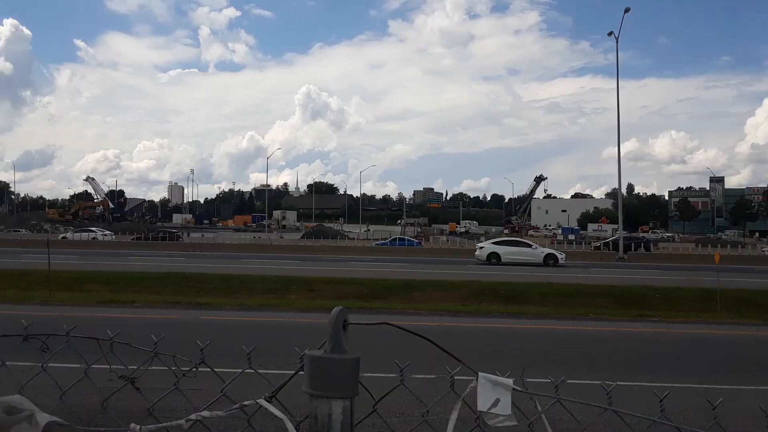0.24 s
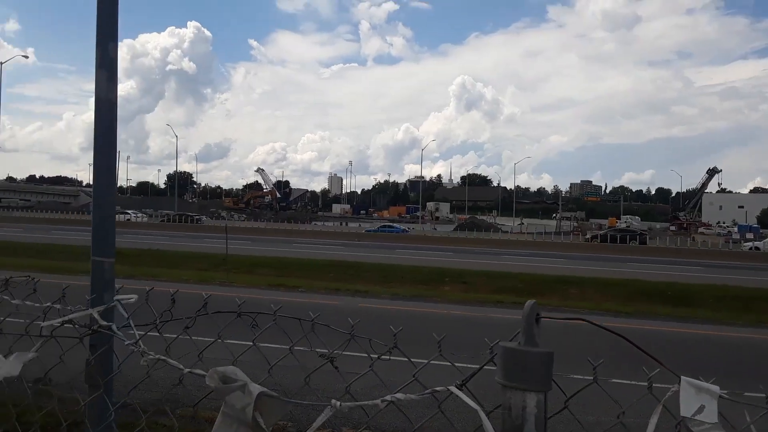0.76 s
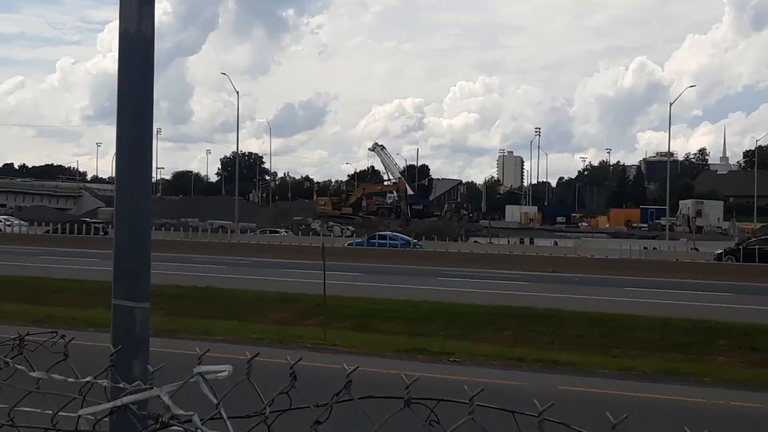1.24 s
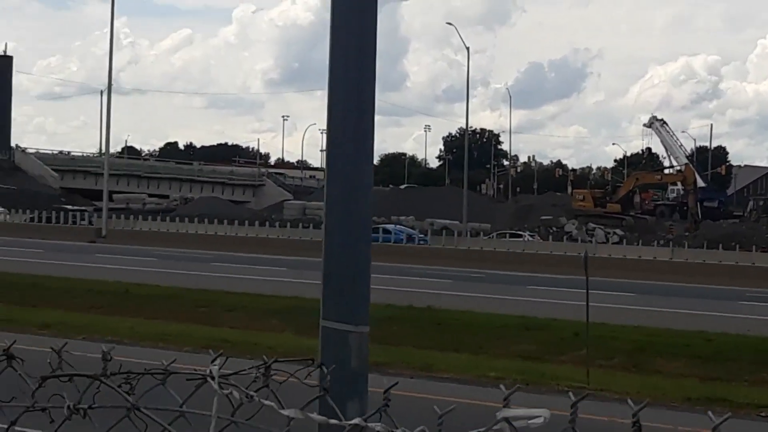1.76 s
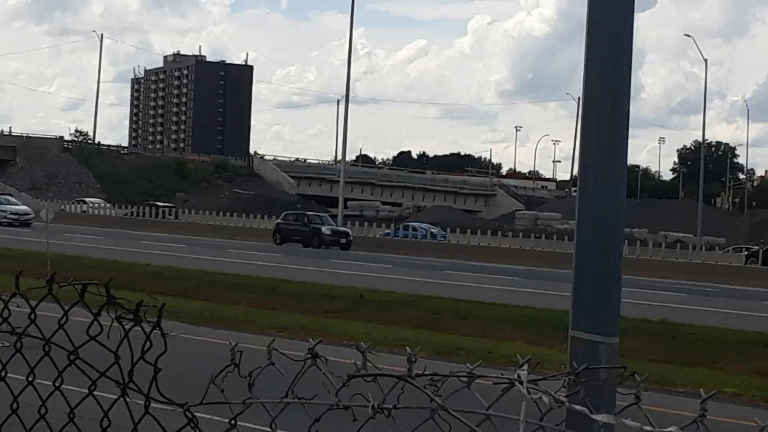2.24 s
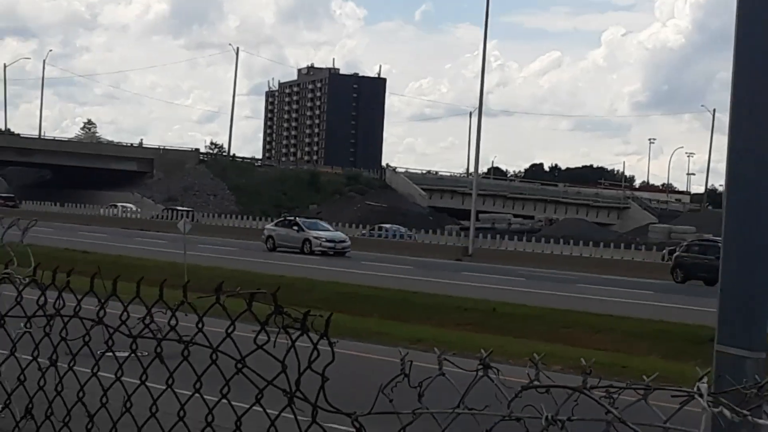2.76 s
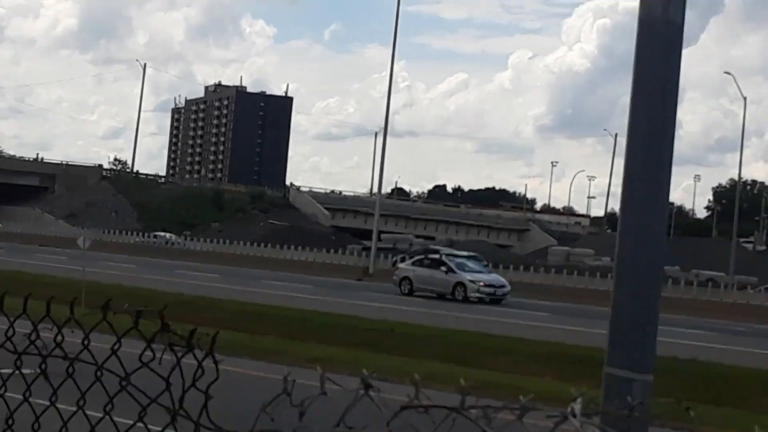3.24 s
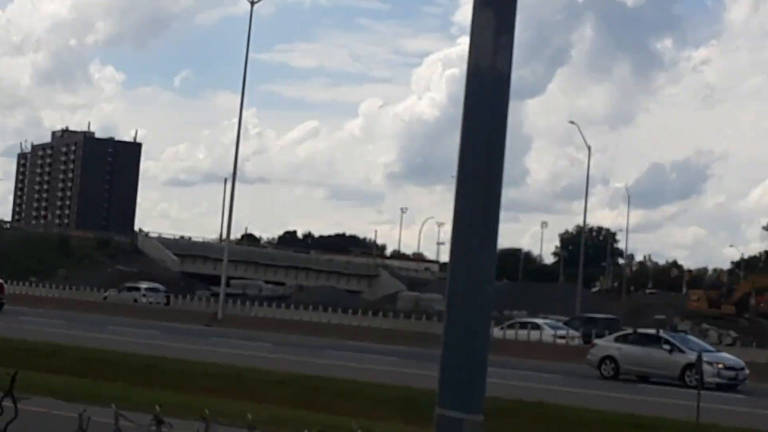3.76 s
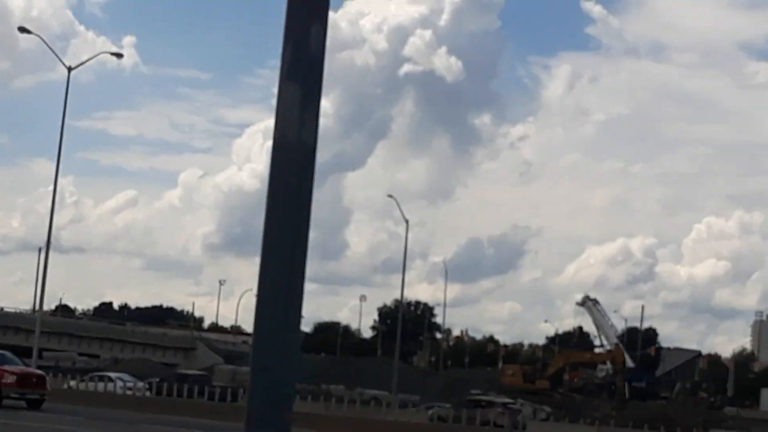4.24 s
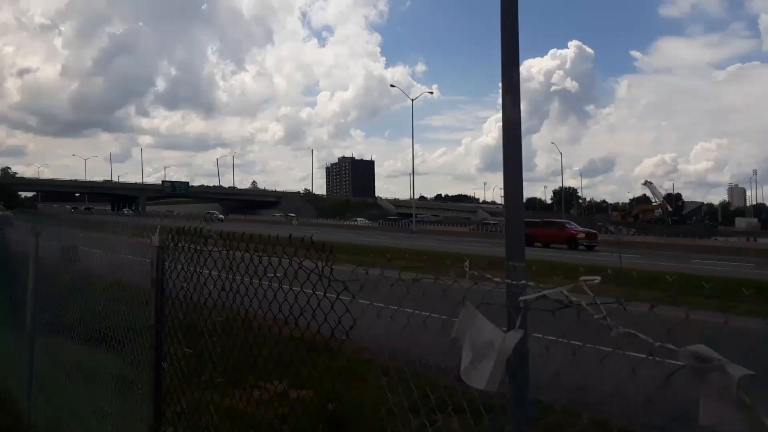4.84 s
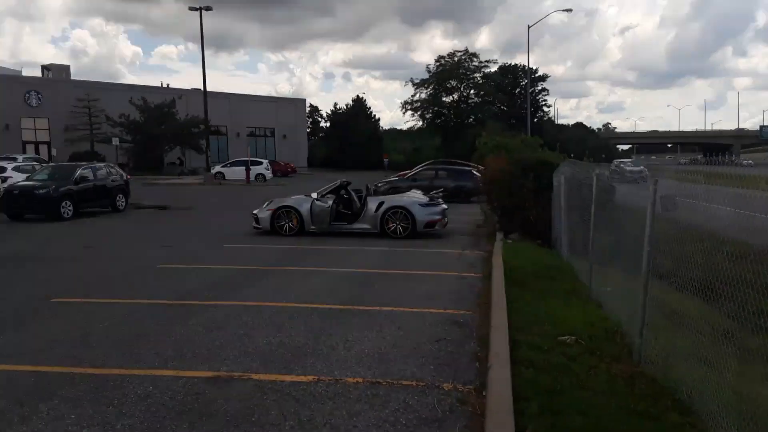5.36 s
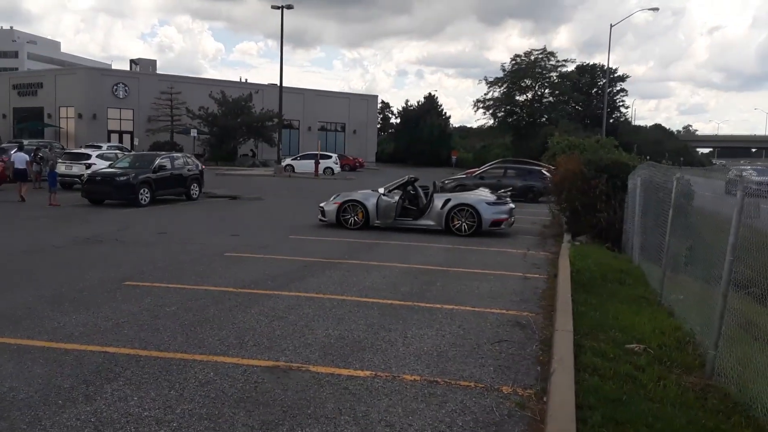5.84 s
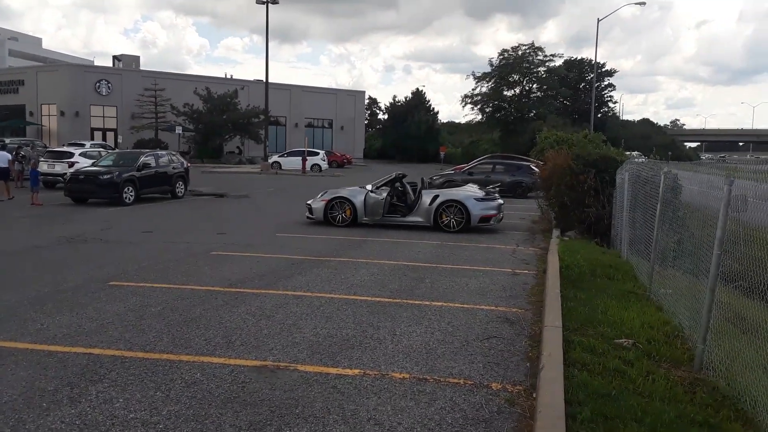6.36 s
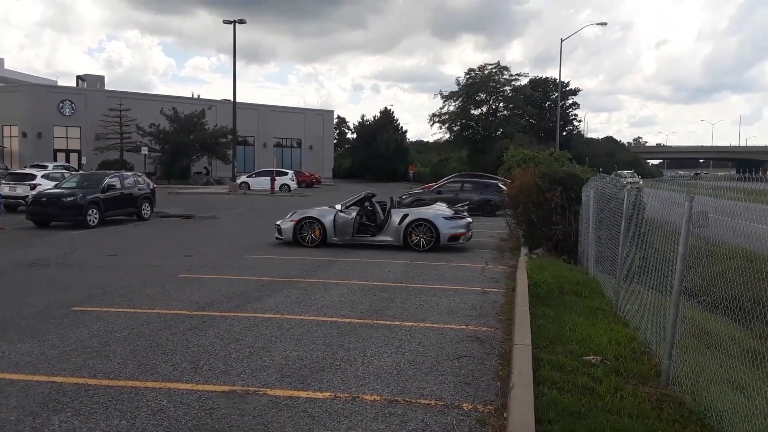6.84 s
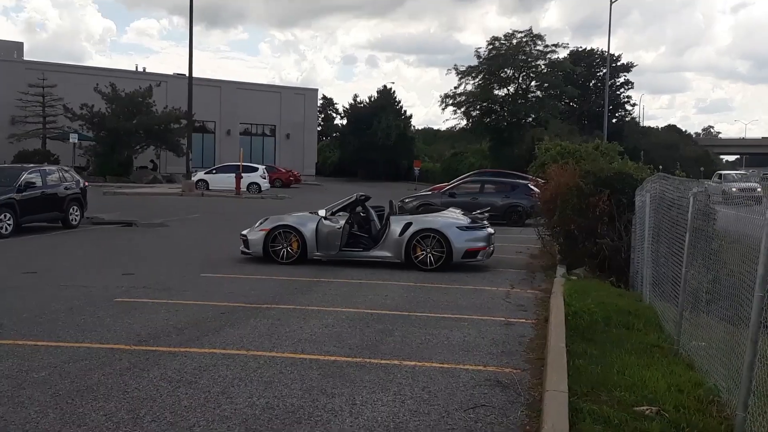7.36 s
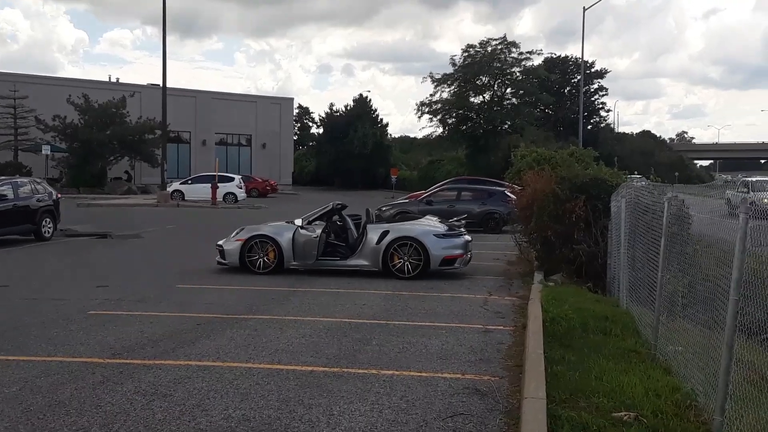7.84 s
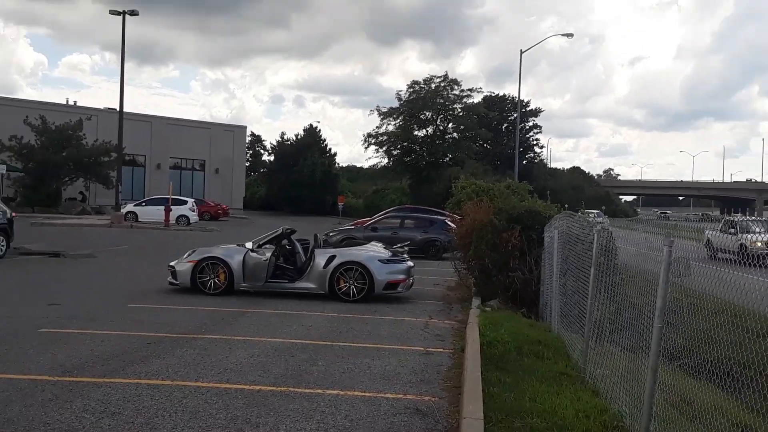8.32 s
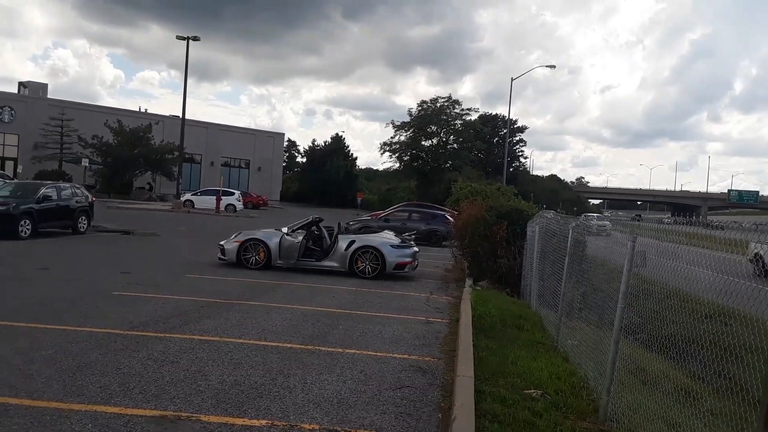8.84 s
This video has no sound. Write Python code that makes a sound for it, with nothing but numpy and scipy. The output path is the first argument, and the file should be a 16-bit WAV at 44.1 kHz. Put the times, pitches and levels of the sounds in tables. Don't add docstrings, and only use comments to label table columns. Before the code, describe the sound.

Hand-held stereo phone beside a busy highway. After a split second of gusty wind and a short silence, many tyres and engines blend into a continuous rush. Individual cars sweep by in overlapping swishes, with low wavering engine hums in the second half. Wind bumps the microphones, strongest in the first half. Finally a heavy vehicle swells close, with a gritty, repeating wheel scrape growing louder.

```python
import sys
import numpy as np
from scipy import signal
from scipy.fft import rfft, irfft, next_fast_len
from scipy.io import wavfile
from scipy.ndimage import uniform_filter1d, map_coordinates

SR = 44100
rng = np.random.default_rng(int(sys.argv[2]) if len(sys.argv) > 2 else 0)


def voltage_ratio(decibels):
    exponent = np.asarray(decibels, float) / 20
    return 10 ** exponent


def generate_wav(signal):
    frames = np.transpose(np.atleast_2d(signal))
    scaled = np.clip(frames, -1, 1) * 32767
    pcm = np.round(scaled).astype(np.int16)
    wavfile.write(sys.argv[1], SR, pcm)


N = 400869
FRAME = 1024


def unit(x):
    return x / np.sqrt(np.mean(np.abs(x) ** 2) + 1e-20)


def along(points, hz):
    f, v = np.transpose(points)
    return np.interp(np.log(hz + 1), np.log(f + 1), v)


def curves(rows, t):
    s, *cols = np.transpose(rows)
    return [np.interp(t, s, c) for c in cols]


def wobble(rate_hz, channels=1):
    knots = rng.standard_normal((channels, int(N * rate_hz / SR) + 4))
    position = np.arange(N) * rate_hz / SR
    return np.array([map_coordinates(k, [position]) for k in knots])


def coloured(x, points):
    m = next_fast_len(N + 8192)
    hz = np.fft.rfftfreq(m, 1 / SR)
    inside = (hz > points[0][0]) * (hz < points[-1][0])
    gain = voltage_ratio(along(points, hz)) * inside
    return irfft(rfft(x, m) * unit(gain), m)[..., :N]


def thumps(ports, cycles, boost_db):
    out = np.zeros((2, N + 1600))
    t = np.arange(-800, 800) / SR
    for port, rows in enumerate(ports):
        for (s, db, hz), turn in zip(rows, rng.random(len(rows))):
            swing = np.exp(-(t * hz / cycles) ** 2) * np.cos(2 * np.pi * (hz * t + turn))
            out[port, round(s * SR):][:len(t)] += voltage_ratio(db + boost_db) * swing
    return out[:, 800:N + 800]


# t/s, left level/dB, right level/dB
CAR_PARK_GUST = [(0, -22.5, -21), (.08, -22, -26), (.1, -47, -33), (.17, -39.5, -36)]
# f/Hz, level/dB
CAR_PARK_GUST_COLOUR = [(40, -19), (150, -9), (330, -2), (480, -7.5), (700, -14.5), (1100, -23.5),
                        (1700, -39), (2500, -64)]
# f/Hz, density/(dB per Hz)
CAR_PARK_FLOOR_COLOUR = [(200, -7), (800, -4.5), (1320, -8), (1700, -10), (2900, -18), (5500, -31),
                         (8200, -45), (15700, -43.5)]
# t/s, level/dB, f/Hz
CAR_PARK_THUMPS = [
    [(.0002, -9.5, 418), (.012, -11, 420), (.037, -9, 380), (.048, -7, 423), (.08, -14, 380),
     (.1695, -23, 254)],
    [(.004, -8, 397), (.041, -4.5, 394), (.049, -11, 435), (.064, -11, 360), (.083, -21, 320),
     (.12, -25, 350), (.127, -23, 700), (.144, -24, 750)],
]


def car_park():
    lumps = unit(voltage_ratio(2.1 * wobble(80, channels=2)))
    gust = coloured(lumps * rng.standard_normal((2, N)), CAR_PARK_GUST_COLOUR)
    level = voltage_ratio(np.array(curves(CAR_PARK_GUST, np.arange(N) / SR)))
    floor = voltage_ratio(-45) * coloured(rng.standard_normal((2, N)), CAR_PARK_FLOOR_COLOUR)
    return level * gust + thumps(CAR_PARK_THUMPS, cycles=0.76, boost_db=-0.5) + floor


# t/s, half length/s, level/dB
WIND_GUSTS = [
    [(.9, .1, -37), (1.88, 0.089, -31.5), (2.35, 0.17, -32), (2.65, 0.15, -32), (3.1, 0.14, -34),
     (3.8, 0.29, -24.5), (4.3, 0.14, -32), (4.7, .1, -23.5), (5.6, 0.21, -27), (8.1, .1, -38),
     (9.05, .1, -43)],
    [(1.1, .1, -43), (1.8, 0.18, -34.5), (3.28, .13, -20), (3.68, 0.16, -18.5), (4.1, .12, -32),
     (4.7, 0.24, -25.5), (5.28, .12, -29.5), (6.3, 0.11, -32), (8.35, 0.1, -52), (8.7, .1, -44)],
]
# f/Hz, level/dB
BUFFET_COLOUR = [(30, -31.5), (60, -10), (110, 1.5), (220, -7), (400, -11), (800, -25.5), (1600, -52.5)]
# t/s, level/dB, f/Hz
WIND_THUMPS = [
    [(1.804, -9.5, 170), (2.379, -11, 170), (2.436, -10, 169), (4.221, -13, 170), (4.661, -2.5, 170),
     (4.71, -7, 170), (5.687, -18, 170)],
    [(2.005, -12.5, 172), (3.251, -3, 170), (3.349, -6, 170), (3.488, -8, 170), (3.63, 1, 400),
     (3.639, -3, 170), (3.67, -3, 300), (3.72, -10, 170), (3.845, -5, 170), (5.232, -3, 170),
     (6.31, -12, 170)],
]


def wind():
    t = np.arange(N) / SR
    calm = voltage_ratio(-46.5)
    level = [calm + sum(voltage_ratio(db - 2.5) * np.exp(-((t - s) / span_s) ** 2) for s, span_s, db in port)
             for port in WIND_GUSTS]
    lumps = unit(voltage_ratio(3.2 * wobble(30, channels=2)))
    buffet = coloured(lumps * rng.standard_normal((2, N)), BUFFET_COLOUR)
    return level * buffet + thumps(WIND_THUMPS, cycles=0.34, boost_db=-1)


# start t/s, end t/s, start f/Hz, end f/Hz, level/dB
VEHICLE_TONES = [(3.13, 3.6, 341, 336.6, -43), (4.199, 6.793, 336.1, 284.5, -34),
                 (5.8, 7.8, 180.7, 110, -34), (6.3, 9.3, 260.8, 220, -35), (6.2, 8.1, 129, 127.4, -31.5),
                 (5.4, 6.6, 117, 119.3, -38), (6.8, 9.393, 150, 199, -34), (8.199, 8.2, 229, 222, -30),
                 (7.91, 9.3, 130, 150, -33.5), (8.3, 19, 61, 32, -39)]


def hums():
    t = np.arange(N) / SR
    out = np.zeros(N)
    for start_s, end_s, from_hz, to_hz, db in VEHICLE_TONES:
        u = np.clip((t - start_s) / (end_s - start_s), 0, 1)
        pitch, level = wobble(8, channels=2)
        hz = (from_hz + (to_hz - from_hz) * u) * (1 + .017 * pitch)
        phase = 2 * np.pi * np.cumsum(hz) / SR
        swell = np.sqrt(np.sin(np.pi * u).clip(0))
        out += voltage_ratio(db + 2 + 3.2 * level) * swell * np.sin(phase)
    return np.array([np.roll(out, 8), out])


# t/s, turns made
WHEEL_TURNS = [(6.9258, 0), (7.5419, 9), (7.8916, 14), (8.1061, 17), (8.383, 21), (8.5875, 24), (8.786, 27),
               (9.0504, 31)]
# t/s, level/dB
RASP_LEVEL = [(6.93, -39), (7.7, -32), (8.22, -27), (8.45, -26.5), (8.52, -22.5), (8.65, -24),
              (8.78, -18.5), (8.88, -21), (9.02, -17)]
# delay/s, level/dB
RASP_ECHOES = [(0, 0.5), (.013, -10.5), (.026, -8.5), (.05, -12.5)]
# f/Hz, level/dB
BODY_COMING = [(2800, -23.5), (4200, -9), (4800, -5), (5400, -1.5), (6300, 2.5), (6800, -5.5),
               (7400, -18.5), (8200, -30)]
# f/Hz, level/dB
BODY_BESIDE = [(2400, -7), (3600, -5), (4250, -2), (4700, -0.5), (5600, -4), (6250, -5), (7400, -24),
               (8200, -32)]
# f/Hz, level/dB
TOP_COMING = [(7500, -11), (9000, -7.5), (10700, -7.5), (12000, -6.5), (13000, 0.5), (14000, -2.5),
              (15000, -7.5), (15700, -7.5)]
# f/Hz, level/dB
TOP_BESIDE = [(7500, -10), (9200, -8.5), (10700, -6), (12000, -9.5), (13000, -4.5), (14000, 3.5),
              (15000, -2), (15700, -5)]


def wheel():
    beat_db, beat_lead_turns, top_db = 0.5, .25, -26.5
    alongside_s, turnover_s = 8.67, 0.11
    direct = .8
    body, top = np.zeros(N + SR), np.zeros(N + SR)
    t = np.arange(SR // 20) / SR
    shape = (1 - np.exp(-(t / 0.0042) ** 2)) * np.exp(-(t / 0.014) ** 2)

    marks_s, made = np.transpose(WHEEL_TURNS)
    turn = np.arange(made[-1] + 1)
    times_s = np.interp(turn, made, marks_s)
    levels_db, = curves(RASP_LEVEL, times_s)
    levels_db += beat_db * np.cos(2 * np.pi * (turn + beat_lead_turns) / 3)
    lucks = rng.standard_normal((len(turn), len(RASP_ECHOES)))
    for s, db, luck in zip(times_s, levels_db, lucks):
        for (late_s, echo_db), chance in zip(RASP_ECHOES, luck):
            stray = chance * (late_s > 0)
            at = round((s + late_s + .0015 * stray) * SR) - 240
            body[at:at + len(t)] += voltage_ratio(db + echo_db - 3.5 + 2 * stray) * shape
            top[at:at + len(t)] += voltage_ratio(db + top_db + 1.2 * luck[0] + echo_db + 2.0) * shape

    grit = unit(voltage_ratio(2.2 * wobble(700)[0]))
    noise = rng.standard_normal((3, N))
    common = np.array([np.roll(noise[0], 17), noise[0]])
    pair = np.sqrt(direct) * common + np.sqrt(1 - direct) * noise[1:]
    beside = (1 + np.tanh((np.arange(N) / SR - alongside_s) / turnover_s)) / 2
    rasp = np.zeros((2, N))
    for part, coming, here in [(body, BODY_COMING, BODY_BESIDE), (top, TOP_COMING, TOP_BESIDE)]:
        for share, colour in [(1 - beside, coming), (beside, here)]:
            rasp += coloured(pair * grit * part[:N] * np.sqrt(share), colour)
    return rasp * voltage_ratio([[1.5], [-1.5]])


def passing(t, s, span_s):
    return 1 / (1 + ((t - s) / span_s) ** 2)


def rush(hz, colour, level_db, lag_ms, direct, patchy_db):
    z = signal.stft(rng.standard_normal((3, N)), nperseg=FRAME)[2]
    field = rng.standard_normal(z.shape[1:])
    field = uniform_filter1d(uniform_filter1d(field, 10, 0), 6, 1)
    gain = colour / np.sqrt(np.mean(colour ** 2, axis=0)) * voltage_ratio(level_db + patchy_db * unit(field))
    delay = np.exp(-1j * np.pi * hz * lag_ms / 1000)
    share = np.clip(direct, 0, 1)
    return gain * (np.sqrt(share) * z[0] * [delay, delay.conj()] + np.sqrt(1 - share) * z[1:])


# t/s, nearness/(0-1)
NEARNESS = [(.26, 0), (3, 0.05), (4.5, 0.63), (6.4, 0.47), (7, 0.74), (7.8, 0.5), (8.15, 0.64), (8.6, 0.91),
            (9.09, 0.88)]
# f/Hz, density/(dB per Hz)
FAR_COLOUR = [(45, -17), (70, -1), (115, -2), (300, -2), (520, -8), (1050, -1), (1600, -6), (2300, -9.5),
              (3000, -20.5), (4100, -31), (5600, -31), (6600, -40.5), (7600, -49.5), (8800, -63.5)]
# f/Hz, density/(dB per Hz)
MIDWAY_COLOUR = [(70, -5.5), (115, -5), (300, -2), (510, -8.5), (640, -5), (900, -1), (1300, -2),
                 (1700, -7), (2200, -9), (3000, -20.5), (4100, -30), (5800, -29.5), (7000, -40.5),
                 (8600, -57)]
# f/Hz, density/(dB per Hz)
NEAR_COLOUR = [(70, -11.5), (120, -3.5), (230, -1.5), (310, -11), (500, -14), (720, -2.5), (860, 4.5),
               (1080, -10.5), (2200, -10.5), (3000, -24.5), (4000, -31.5), (5500, -20.5), (7000, -32.5),
               (8600, -50)]
# f/Hz, density/(dB per Hz)
SIZZLE_COLOUR = [(8800, -6.5), (10000, -3.5), (11500, -2.5), (13000, 1), (14200, 2), (14800, -0.5),
                 (15700, -6.5)]
BED_LEVEL_DB = [-29.5, -22.5, -25.5, -47.5, -76.5]
HEAVY_OVER_BED_DB = [2.5, 4.5, -0.5, 2.5, 12]
NEARNESS_GAIN_DB = [2.68, 0.1, 0.1, 0.1, 7]
# closest t/s, lane distance over speed/s, level over bed/dB, tyre colour/(octaves above 1 kHz)
PASSING_CARS = [(.5, 0.18, 2.5, 2.5), (1.029, 0.39, 6, 3.16), (1.58, .1, -3.5, 1), (2.02, .12, -2.5, -1),
                (2.46, 0.18, 3, 2), (2.78, .12, -3, 0.5), (2.82, .2, 5, 3), (3.34, 0.26, 4.5, 2.5),
                (3.3, 0.26, -2, -0.7), (3.62, 0.27, 2.5, 2.7), (3.93, 0.16, 5, 3), (4.5, 0.38, 3, 2.2),
                (4.85, 0.22, 3, 2.1), (5.2, .12, 0, -3.2), (5.32, 0.21, 2.5, 2.1), (6.4, .15, -7, 0.5),
                (6.45, 0.42, 3, 2.5), (6.86, 0.17, 0.5, 2.5), (7.05, 0.27, -4, -0.8), (7.2, 0.36, 9.5, 8),
                (7.33, 0.1, -4.5, 2), (7.4, 0.28, 2.5, 2.5), (7.4, .08, 3, -3), (7.74, 0.085, -1, 0),
                (7.96, 0.25, 5.5, 3), (8.18, .12, 0.5, -1.4), (8.4, 0.09, -3.5, 2), (8.5, .2, 3, -3.5),
                (8.62, .12, 2, -0.4)]
# t/s, length/s, f/Hz, rise/(Hz per s), level over tread/dB
TYRE_SWISHES = [(4.38, 0.15, 1810, 0, 6), (4.823, 0.059, 1910, -2, 4.5), (5.17, 0.06, 2070, 3005, 4.5),
                (7.4, 0.21, 1930, 1002, 3)]
# t/s, left lag/(share of usual), direct sound/(share of usual), left-right/dB
PHONE_FACING = [(.26, 1.26, 0.78, 0.3), (1.15, 1.2, 1.43, 0.4), (2, 0.99, 0.95, -0.3),
                (2.8, 0.79, 0.47, -1.3), (3.8, 1.1, 0.92, 0.9), (4.25, 0.98, 0.62, -.6),
                (4.8, 1.07, .6, 0.6), (5.4, 1.14, 0.95, 0), (6, 1.01, 1.05, -0.5), (7.2, 0.95, 0.97, 1),
                (7.7, 1.21, 1.09, 0.9), (8.2, 0.91, 1.05, -1.2), (8.7, 0.84, 1.12, 0.2),
                (9.09, 0.84, 1.04, .1)]
USUAL_LAG_MS = [.2, 0.24, 0.33, 0.442, .44]
USUAL_DIRECT = [0.99, 0.88, 0.51, 0.1, .16]
# f/Hz, left-right/dB
PORT_LEAN = [(60, 0), (180, -0.5), (550, 0.5), (1650, 1.5), (4970, 2.5), (15000, 3)]


def traffic():
    hop = FRAME // 2
    hz = np.fft.rfftfreq(FRAME, 1 / SR)[:, None]
    t = np.arange(-(-N // hop) + 1) * hop / SR
    lag, direct, pan_db = curves(PHONE_FACING, t)
    near, = curves(NEARNESS, t)
    far, close = np.clip(1 - 2 * near, 0, 1), np.clip(2 * near - 1, 0, 1)

    heavy = passing(t, 9.17, span_s=0.79)
    octave = np.log2((hz + 1) / 1000)
    cars = sum(voltage_ratio(2 * db) * passing(t, s, span_s) ** 2 * np.exp(-(octave - tone) ** 2)
               for s, span_s, db, tone in PASSING_CARS)
    rumble_db, roar_db, tread_db, hiss_db, sizzle_db = [
        bed + gain * near + 10 * np.log10(1 + cars + voltage_ratio(2 * db) * heavy)
        for bed, gain, db in zip(BED_LEVEL_DB, NEARNESS_GAIN_DB, HEAVY_OVER_BED_DB)]
    swish_db = sum(db * np.exp(-((t - s) / span_s) ** 2 - ((hz - centre_hz - rise * (t - s)) / 450) ** 2)
                   for s, span_s, centre_hz, rise, db in TYRE_SWISHES)

    midway_db = (1 - far - close) * along(MIDWAY_COLOUR, hz)
    colour = voltage_ratio(far * along(FAR_COLOUR, hz) + midway_db + close * along(NEAR_COLOUR, hz))

    def band(low_hz, high_hz):
        slopes = np.sqrt((1 + (low_hz / (hz + 1)) ** 10) * (1 + (hz / high_hz) ** 10))
        return colour / slopes * (hz < 9000)

    sizzle = voltage_ratio(along(SIZZLE_COLOUR, hz)) * (hz > 8600) * (hz < 15750)
    ms, share = np.outer(USUAL_LAG_MS, lag), np.outer(USUAL_DIRECT, direct)
    hiss_share = USUAL_DIRECT[3] + 0.17 * heavy
    sizzle_share = USUAL_DIRECT[4] + .15 * heavy
    z = rush(hz, band(50, 450), rumble_db, ms[0], USUAL_DIRECT[0], patchy_db=1)
    z += rush(hz, band(447, 1320), roar_db, ms[1], share[1], patchy_db=0.72)
    z += rush(hz, band(1288, 3840), tread_db + swish_db, ms[2], share[2], patchy_db=0.75)
    z += rush(hz, band(3400, 12000), hiss_db, USUAL_LAG_MS[3], hiss_share, patchy_db=2.0)
    z += rush(hz, sizzle, sizzle_db, USUAL_LAG_MS[4], sizzle_share, patchy_db=2.2)

    lean_db = (along(PORT_LEAN, hz) + pan_db * hz / (hz + 300)) / 2
    sound = signal.istft(z * voltage_ratio([lean_db, -lean_db]), nperseg=FRAME)[1][:, :N]
    return sound * voltage_ratio(0.34 * wobble(3.1) + 0.11 * wobble(12))


def scene():
    cut_s, start_s = .1705, .2538
    t = np.arange(N) / SR
    road = wind() + hums() + wheel() + traffic()
    return car_park() * (t < cut_s) + road * (t > start_s)


def roll_off(x):
    return signal.sosfilt(signal.butter(12, 15750, fs=SR, output="sos"), x)


def record(dry):
    low_cut = signal.butter(3, 59, "highpass", fs=SR, output="sos")
    sounding = np.abs(dry) > 0
    mix = signal.sosfilt(low_cut, dry) * sounding
    return roll_off(mix)


dry = scene()
out = record(dry)
generate_wav(out)
```